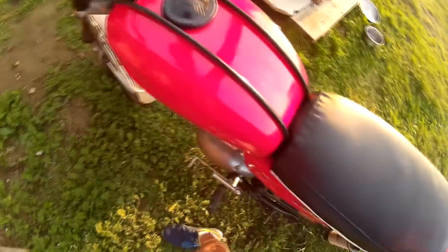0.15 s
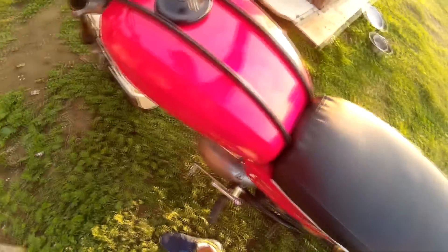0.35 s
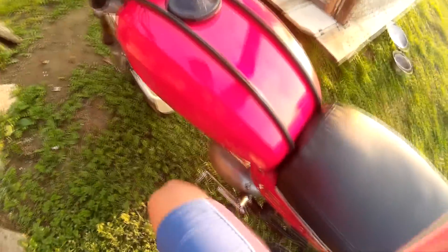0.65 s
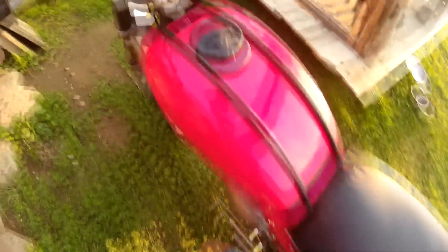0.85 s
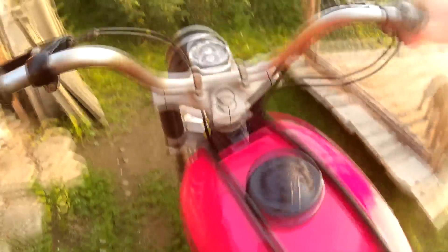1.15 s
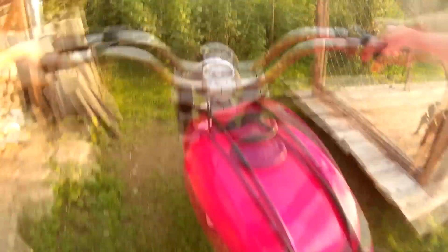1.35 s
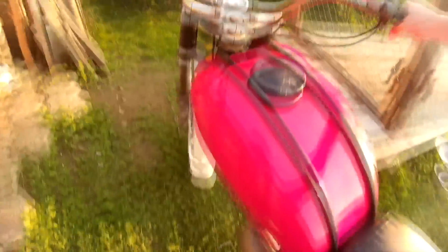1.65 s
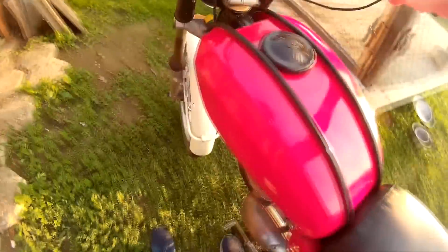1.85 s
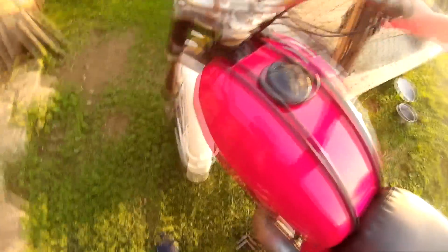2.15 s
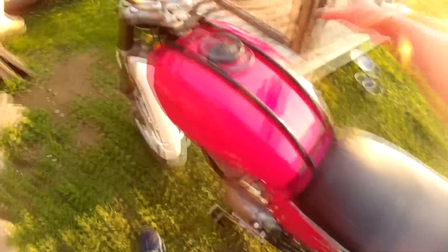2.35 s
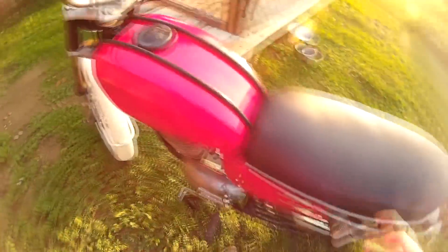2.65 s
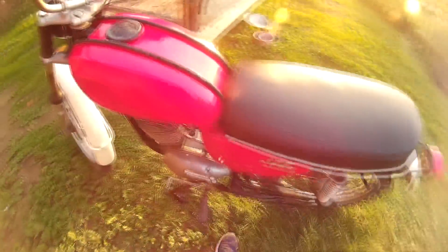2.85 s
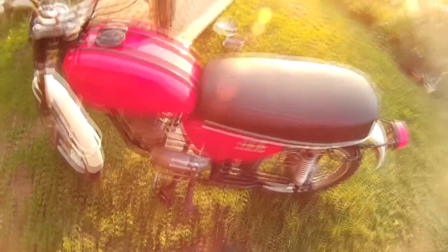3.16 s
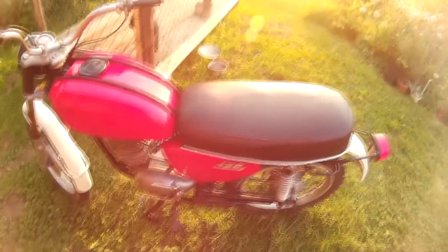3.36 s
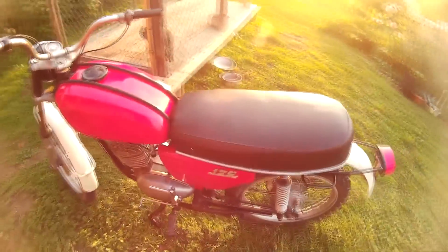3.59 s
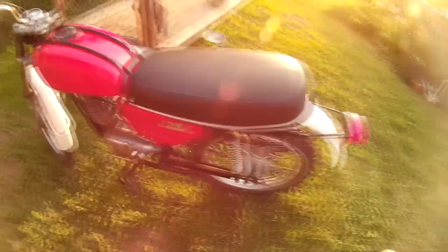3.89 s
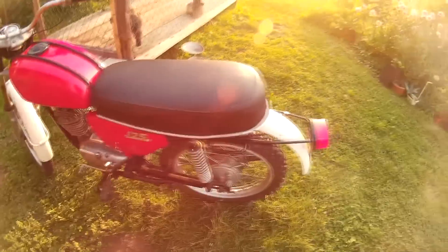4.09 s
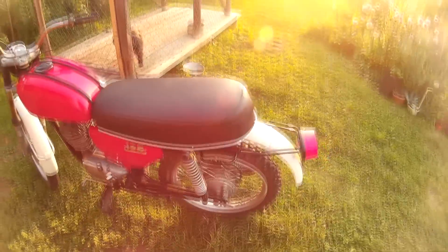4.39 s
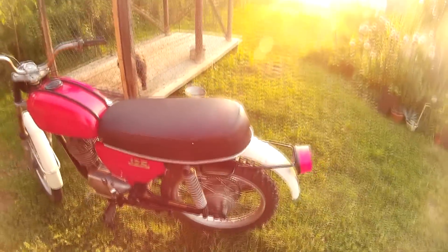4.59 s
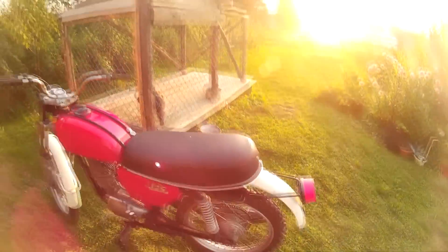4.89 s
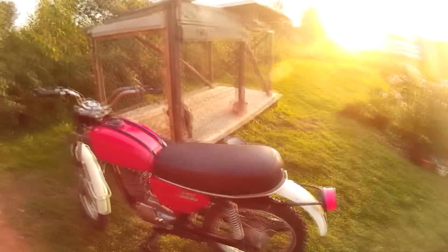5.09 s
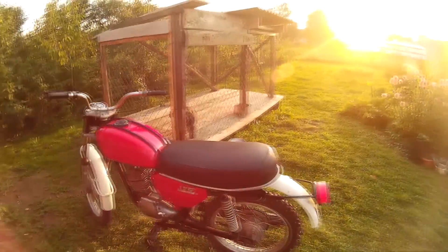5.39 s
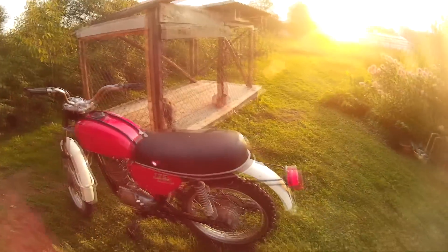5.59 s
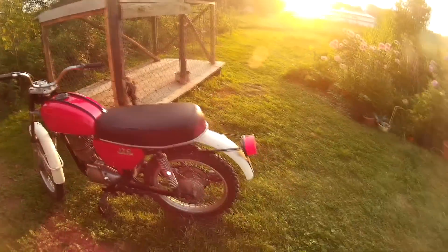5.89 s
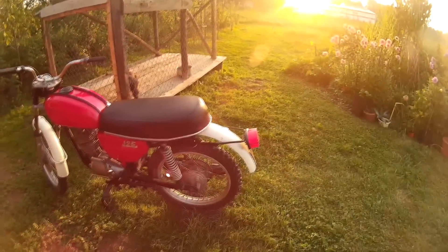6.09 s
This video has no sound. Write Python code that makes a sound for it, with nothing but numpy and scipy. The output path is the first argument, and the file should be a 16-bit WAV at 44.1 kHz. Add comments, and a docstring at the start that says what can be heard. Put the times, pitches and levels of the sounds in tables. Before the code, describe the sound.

A small single-cylinder two-stroke motorcycle idles unevenly on a lawn, nearly stalling, then picking up into quicker, louder barking pops heard toward the rear.

```python
"""On a lawn a single-cylinder two-stroke motorcycle idles, heard from near the tank round to the rear.
Some turns fire with a thump and a bark; between them the coasting crank gives weaker puffs.
Each exhaust puff is a few pressure waves and a wake of eddies, coloured by the pipe and its echoes.
Between puffs the intake gulps, fins ring, cases clatter, gas rushes and moving parts tick faintly.
A sheet-metal hum, a weak garden scatter and a faint hiss complete it; peaks near full scale clip."""
import sys
import numpy as np
from scipy import signal
from scipy.fft import rfft, irfft
from scipy.io import wavfile
from scipy.ndimage import uniform_filter1d

SR = 44100
rng = np.random.default_rng(int(sys.argv[2]) if len(sys.argv) > 2 else 0)


def log_audio(samples):
    """Write samples as a 16-bit WAV file to the path given in sys.argv[1]."""
    # one column per channel
    frames = np.atleast_2d(samples).T
    # limit to full scale, then quantise
    limited = np.clip(frames, -1, 1)
    pcm = np.round(limited * 32767).astype(np.int16)
    wavfile.write(sys.argv[1], SR, pcm)


N = 275184
T = np.arange(N) / SR

# Proper firings. Each row: start in seconds, thump in dB, bark in dB, before the exhaust trims.
FIRINGS = [(0.0643, -14, -28), (.298, -12.5, -18.5), (.5697, -15, -21), (0.9285, -11.5, -19),
           (1.2287, -10, -18.5), (1.4903, -9, -18.5), (1.6724, -11.5, -21.5), (1.8638, -15, -15.5),
           (2.0614, -10, -13), (2.2386, -12.5, -14), (2.406, -12.5, -16.5), (2.5768, -12.5, -12),
           (2.744, -14, -16.5), (2.8294, -12, -13.5), (3.0616, -11.5, -12.5), (3.2908, -13, -10.5),
           (3.4923, -14.5, -11), (3.627, -13.5, -9.5), (3.8321, -13, -10.5), (3.9701, -14, -10),
           (4.1765, -14.5, -11), (4.3185, -14.5, -9), (4.525, -14.5, -7.5), (4.726, -14, -9),
           (4.9305, -13, -11.5), (5.0667, -13.5, -12), (5.203, -17, -16), (5.2719, -16.5, -21),
           (5.3444, -16, -18.5), (5.4148, -18.5, -19.5), (5.4856, -16, -11.5), (5.6247, -16.5, -19),
           (5.693, -14, -17.5), (5.836, -17, -9.5), (6.0471, -19.5, -11.5)]
# Idle speed: nearly stalls, picks up, settles. Each row: time in seconds, target turns per second.
IDLE_SPEED = [(0, 13), (.75, 8.5), (1.3, 11), (2, 10.7), (3.4, 14.7), (6.24, 14.4)]
# Misfire after refilling with fresh mixture. Each row: time in seconds, thump in dB, bark in dB.
MISFIRE_LEVEL = [(0, -20.5, -30), (.47, -16, -32), (.8, -23, -31), (1.15, -19, -33.5), (1.77, -17.5, -26.5),
                 (3.201, -17.5, -24), (4.5, -16, -19.5), (6.24, -17.5, -23.5)]
# A bang shortens the next turn by this share, before the turns are scaled to fill the gap.
KICK, KICK_TURNS = 0.11, .55
# Burnt gas left by a bang weakens the puff by this much; it recovers over about REFILL_TURNS.
SPENT_THUMP_DB, SPENT_BARK_DB, REFILL_TURNS = -3, -10.5, .45


def strokes(end_s=6.254):
    """Every turn as (s, thump dB, bark dB): a bang, then misfires that slow down as the cylinder refills."""
    misfire_s, thump_db, bark_db = np.transpose(MISFIRE_LEVEL)
    next_starts = [row[0] for row in FIRINGS[1:]] + [end_s]
    rows = []
    for bang, next_s in zip(FIRINGS, next_starts):
        gap_s = next_s - bang[0]
        count = max(round(gap_s * at(IDLE_SPEED, bang[0] + gap_s / 2)), 1)
        lengths = 1 - KICK * np.exp(-np.arange(count) / KICK_TURNS)
        times = bang[0] + gap_s * np.cumsum(lengths)[:-1] / lengths.sum()
        spent = np.exp(-np.arange(count - 1) / REFILL_TURNS)
        thumps = np.interp(times, misfire_s, thump_db) + SPENT_THUMP_DB * spent
        barks = np.interp(times, misfire_s, bark_db) + SPENT_BARK_DB * spent
        rows += [bang, *zip(times, thumps, barks)]
    return np.array(rows)


# Way round the bike. Each row: time in seconds, place (0 over the tank, 1 beside the seat, 2 behind).
LISTENER_PLACE = [(0, 0.14), (2.0, 0.48), (2.9, 0.68), (4.6, 1.255), (5.3, 1.55), (6.24, 1.77)]
# Bark spectrum. Each row: frequency in Hz, dB over the tank, dB beside the seat, dB behind.
BARK_SPECTRUM = [(146, -6, -18, -1.5), (338, -15.5, -3, 1), (388, -6, -14.5, 9.5), (563, -15, 6, -20),
                 (673, -2, -1, -8), (864, -2, 2, -5), (1037, -11, -11, -14.5), (1230, -13, -39, -1),
                 (1470, -28, -41.5, -40), (2230, -27.5, -32, -30.5), (5350, -60, -72, -77)]
# Bark's first waves and expansion-chamber echoes. Each row: delay in seconds, mean signed strength.
BARK_WAVES = [(.0002, 0.4), (.0011, -0.48), (.002, 0.7), (.0078, .6), (.0164, 0.3)]
# Thump spectrum before the pipe, at the mean round trip. Each row: frequency in Hz, level in dB.
BOOM_SPECTRUM = [(20, -43.5), (42, -22), (58, -22.5), (82, 2), (112, -2.5), (140, -10), (165, 4),
                 (240, 5.5), (365, -3.5), (450, -5.5), (700, -19.5), (1100, -28.5), (2500, -71)]
# Pipe echo, quickening as the gas warms. Each row: time in seconds, mean round trip in seconds.
PIPE_TRIP = [(0, .00445), (2.0, .0044), (3.2, .00408), (6.24, .00412)]
MEAN_TRIP_S = np.mean(PIPE_TRIP, axis=0)[1]


def exhaust(thump_db=1, bark_db=0, overload_db=0.5, hot_db=-19, range_db=9, lag_s=0.007986, suction=0.54):
    """Every stroke thumps; burning strokes add a crisp bark, misfires only a ragged chuff."""
    out, bark = np.zeros(N), np.array(BARK_SPECTRUM)
    scatter = .08  # spread of each wave's strength, as a share
    for s, low_db, high_db in strokes():
        place = at(LISTENER_PLACE, s)
        trip_s = at(PIPE_TRIP, s) * (1 + 0.022 * rng.standard_normal())
        place_shares = np.maximum(1 - abs(np.clip(place, 0, 2) - np.arange(3)), 0)
        colour = np.c_[bark[:, 0], bark[:, 1:] @ place_shares]
        burn = np.clip(.5 + (high_db - hot_db) / range_db, 0, 1)  # 0 a misfire, 1 a full bang
        waves = [(lag_s - trip_s, -suction), (lag_s, 1)]  # chamber sucks one round trip before the push
        boom = np.array(BOOM_SPECTRUM) * [MEAN_TRIP_S / trip_s, 1]  # a shorter trip raises the boom
        thump = puff(waves, boom, turbulence=0.4, eddy_s=0.0059,
                     scatter=scatter, trip_s=trip_s, reflect=0.75)
        crack = puff(BARK_WAVES, colour, turbulence=0.51 + 1.9 * (1 - burn), eddy_s=0.0051,
                     scatter=scatter, trip_s=trip_s, reflect=0.2)
        crack_db = high_db + bark_db + overload_db * burn
        add(out, s, amp(low_db + thump_db) * thump + amp(crack_db) * crack)
    return out


def puff(paths, colour, turbulence, eddy_s, scatter, trip_s=0, reflect=0, size=4096):
    """One pressure pulse with its echoes and a wake of eddies; rms 1 over a fiftieth of a second."""
    t, drive = np.arange(size) / SR, np.zeros(size)
    for delay_s, strength in paths:
        add(drive, delay_s, np.array([strength * (1 + scatter * rng.standard_normal())]))
    wake = rng.standard_normal(size) * t * np.exp(-t / eddy_s)
    drive += turbulence * wake / np.linalg.norm(wake)
    sound = pipe(through(drive, ring(colour)), trip_s, reflect)
    return sound / np.linalg.norm(sound) * np.sqrt(SR / 50)


def pipe(x, trip_s, reflect, loss_hz=2200):
    """Each round trip turns the wave over and dulls it: the odd quarter-wave resonances."""
    hz = np.fft.rfftfreq(len(x), 1 / SR)
    echo = np.clip(reflect, 0, .85) * np.exp(-hz / loss_hz - 2j * np.pi * hz * trip_s)
    return irfft(rfft(x) / (1 + echo), len(x))


# Silencer shell and tank modes. Each row: frequency in Hz, peak gain in dB, t60 in seconds.
SHELL_MODES = [(163, -11.5, 0.14), (374.6, -5.5, 0.23), (467.4, -7, 0.077), (860, -14, 0.19)]


def shell(x):
    """Sheet metal shaken by the exhaust keeps humming between the strokes."""
    t = np.arange(SR // 2) / SR
    hum = np.zeros(len(t))
    for hz, db, t60_s in SHELL_MODES:
        fade = amp(-60 * t / t60_s)
        hum += amp(db) * 2 * fade / fade.sum() * np.cos(2 * np.pi * hz * t)
    return x + through(x, hum)


# Air box spectrum. Each row: frequency in Hz, relative level in dB.
AIR_BOX = [(30, -29), (70, -7.5), (110, -3), (138, -6.5), (159, 13), (185, -5.5), (230, -8), (370, -4.5),
           (460, -7.5), (800, -14.5), (1300, -33), (4000, -69)]


def intake(level_db=-25, crank_share=0.31, reference_turn_s=0.066):
    """The rising piston gulps air part of a turn after each stroke."""
    out, starts = np.zeros(N), strokes()[:, 0]
    for s, turn_s in zip(starts, np.diff(starts)):
        gulp = puff([(.003, 0.84)], AIR_BOX, turbulence=1.0, eddy_s=0.0095, scatter=0.074)
        gain = amp(level_db) * reference_turn_s / turn_s  # a faster crank sucks harder
        add(out, s + crank_share * turn_s, gain * gulp)
    return out


# Cooling fin and case modes. Each row: frequency in Hz, width in Hz, relative level in dB.
FIN_MODES = [(1098, 52, -0.5), (1760, 22, -11), (1886, 12, -13.5), (1960, 11, -6.5), (2138, 4.9, 1),
             (2240, 28, 2), (2412, 41, 3), (2526, 9.5, -3.5), (2800, 76, -12), (3190, 260, -11.5)]


def fins(drift=.008):
    """Noise keeps narrow modes of fins and cases ringing, with wavering pitch and level; rms 1."""
    turns = np.cumsum(1 + drift * wander(size=3000)) / SR  # pitch wavers
    out = np.zeros(N)
    for hz, width_hz, db in FIN_MODES:
        pole = np.exp(-np.pi * width_hz / SR)
        drive = rng.standard_normal(N) + 1j * rng.standard_normal(N)
        ringing = signal.lfilter([1], [1, -2 * pole, pole ** 2], drive)
        out += amp(db) * unit((ringing * np.exp(2j * np.pi * hz * turns)).real)
    return unit(out * amp(6.8 * np.tanh(wander(size=900))))  # the driving contact comes and goes


# Dull clatter spectrum. Each row: frequency in Hz, relative level in dB.
CLATTER_SPECTRUM = [(600, -22.5), (1300, -25.5), (1900, -5.5), (2150, 7.5), (2500, 4), (2700, -8),
                    (3200, -8), (3800, -15), (4400, -22), (5200, -41), (8000, -51)]


def clatter(throb=0.89):
    """Dull broadband noise that jolts with each stroke and flickers in level; rms 1."""
    jolts = 1 + throb * shaking(lag_s=0.0023, decay_s=0.014)
    return unit(noise(CLATTER_SPECTRUM) * jolts * amp(4.8 * np.tanh(wander(size=500))))


def shaking(lag_s, decay_s, follow=0.97):
    """How hard the engine shakes: a jolt at each stroke that dies away; rms 1."""
    out, t = np.zeros(N), np.arange(SR // 4) / SR
    for s, low_db, _ in strokes():
        add(out, s + lag_s, amp(follow * low_db) * t * np.exp(-t / decay_s))
    return unit(out)


# Bump in the ringing at each bang: height, lead of its top on the bang, half width at 1/e.
SWELL_DB, SWELL_LEAD_S, SWELL_S = 3, 0.0046, .035


def swell():
    """Gain of the metal's ringing as it swells and sinks around the bangs."""
    frames = T[::100]
    bumps = sum(np.exp(-((frames - row[0] + SWELL_LEAD_S) / SWELL_S) ** 2) for row in FIRINGS)
    return amp(SWELL_DB * np.interp(T, frames, bumps))


# Metal level before trims and swell. Each row: time in seconds, level in dB.
METAL_LEVEL = [(0.05, -39.5), (0.52, -44), (1.2, -49), (1.89, -43), (2.2, -48.5), (3.05, -45.5),
               (3.17, -44.5), (4.34, -42), (5.89, -46), (6.24, -45)]


def metal(fins_db=-1.5, clatter_db=-3):
    """Piston and bearings keep the fins ringing over a clatter, both swelling around the bangs."""
    mix = amp(fins_db) * fins() + amp(clatter_db) * clatter()
    return mix * swell() * amp(at(METAL_LEVEL, T))


# Gas in the silencer, before the pipe. Each row: frequency in Hz, relative level in dB.
RUSH_SPECTRUM = [(25, -30), (42, -12.5), (58, -9), (88, -1.5), (130, -10), (200, -3), (350, 0), (440, -4),
                 (700, -4), (850, -4), (1020, -20.5), (1300, -25), (3000, -41), (9000, -77.5)]
# Gas level before rush_db. Each row: time in seconds, level in dB.
GAS_LEVEL = [(0, -16.5), (.45, -23.5), (.72, -24.5), (.9, -28.5), (1.5, -26), (2, -22), (2.5, -24.5),
             (3.3, -23.5), (4.5, -25), (5.3, -28.5), (5.7, -30), (6.24, -26.5)]


def gas_rush(rush_db=-1.5, surge=.25):
    """Gas rushes through the silencer as noise with weak pipe echoes, surging at each stroke."""
    gas = pipe(noise(RUSH_SPECTRUM), MEAN_TRIP_S, reflect=0.057)
    gas = unit(gas * (1 + surge * shaking(lag_s=0.0041, decay_s=0.005)))
    return gas * amp(at(GAS_LEVEL, T) + rush_db)


# Single ticks near 4.2 kHz and one lower squeak near 1.5 kHz.
# Each row: start in seconds, envelope peak in dB, nominal frequency in Hz.
SINGLE_TICKS = [(0.384, -50, 3970), (0.579, -50, 4180), (.752, -51, 4160), (1.45, -33.5, 1510),
                (1.585, -49, 4150), (1.838, -44.5, 4350), (1.93, -39.5, 4300), (1.956, -42, 4020),
                (2.114, -43, 4240), (2.385, -41, 4100), (2.56, -49, 4340), (2.636, -45, 4240),
                (2.713, -44.5, 4250), (2.808, -44, 4240)]


def ticks(usual_db=-51, usual_hz=4150, decay_s=0.0044, slope_per_s=3.0, jitter=0.053, away_db=-2.5):
    """Faint short ticks of piston and other moving parts ring near 4.2 kHz on every stroke; one low squeak."""
    out, t = np.zeros(N), np.arange(SR // 20) / SR
    starts = strokes()[:, 0]
    events = [(*row, jitter * 0.99) for row in SINGLE_TICKS]
    for s, place in zip(starts, at(LISTENER_PLACE, starts)):
        a, b = rng.standard_normal(2)
        events.append((s + 0.0033, usual_db + 2 * a + away_db * place, usual_hz + 200 * b, jitter))
    envelope = t / decay_s * np.exp(1 - t / decay_s)
    for s, db, hz, spread in events:
        wobble = unit(uniform_filter1d(rng.standard_normal(len(t)), size=50))
        turns = np.cumsum(hz * (1.02 - slope_per_s * t + spread * wobble)) / SR
        add(out, s, amp(db) * envelope * np.sin(2 * np.pi * turns))
    return out


def garden(x, t60_s=0.22, wet_db=-19):
    """A weak scatter from the porch, the woodpile and the bushes: sparse random echoes after 16 ms."""
    t = np.arange(SR // 2) / SR
    sparse = rng.standard_normal(len(t)) * (rng.random(len(t)) < .05)
    taps = sparse * (t > .016) * amp(-60 * t / t60_s)
    return x + amp(wet_db) * through(x, taps / np.linalg.norm(taps))


# Hiss spectrum. Each row: frequency in Hz, relative level in dB.
HISS_SPECTRUM = [(20, 6.5), (4500, 2.5), (6500, -2), (9300, -1.5), (12500, -8), (13700, -9.5), (15000, -13)]


def hiss(level_db=-64.0):
    """Faint even background noise."""
    return amp(level_db) * noise(HISS_SPECTRUM)


def at(points, s):
    """Reads a (time, value) table at time s."""
    return np.interp(s, *np.transpose(points))


def amp(db):
    """Decibels to gain."""
    return 10 ** (np.asarray(db) / 20)


def unit(x):
    """Scales to rms 1."""
    return x / np.sqrt(np.mean(x ** 2) + 1e-20)


def add(mix, s, sound):
    """Mixes a sound in at time s."""
    part = mix[max(round(s * SR), 0):][:len(sound)]
    part += sound[:len(part)]


def ring(points, size=8192):
    """Causal (minimum-phase) impulse response of a body with the given spectrum."""
    hz, db = np.transpose(points)
    bins_hz = abs(np.fft.fftfreq(size, 1 / SR)) + 1
    log_gain = np.log(amp(np.interp(np.log(bins_hz), np.log(hz), db)))
    return np.fft.ifft(np.exp(np.conj(signal.hilbert(log_gain)))).real[:size // 2]


def through(x, response):
    """Passes x through a body."""
    return signal.fftconvolve(x, response)[:len(x)]


def noise(points):
    """Noise of rms 1 with the given spectrum."""
    return unit(signal.fftconvolve(rng.standard_normal(N + 4095), ring(points), "valid")[:N])


def wander(size):
    """Smooth chance of rms 1 that changes over about size samples."""
    smooth = uniform_filter1d(rng.standard_normal(N), size=size)
    return unit(uniform_filter1d(smooth, size=size // 2))


def scene():
    """The idling engine in the open air."""
    engine = garden(shell(exhaust()) + intake())
    return (engine + metal() + gas_rush() + ticks() + hiss())[None]


def record(dry, bass_cut_hz=30, edge_hz=15500):
    """The microphone sheds the deepest bass and clips peaks near full scale; then the band limit."""
    thinned = signal.sosfilt(signal.butter(2, bass_cut_hz, "high", fs=SR, output="sos"), dry)
    clipped = np.clip(thinned, -.99, .99)
    lowpass = signal.firwin(255, edge_hz, window=("kaiser", 9), fs=SR)
    return signal.oaconvolve(clipped, lowpass[None], "same")


dry = scene()
out = record(dry)
log_audio(out)
```